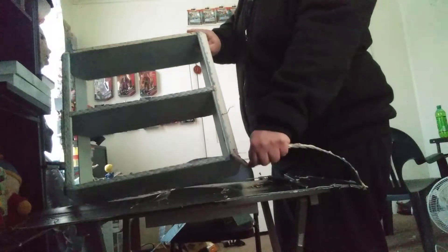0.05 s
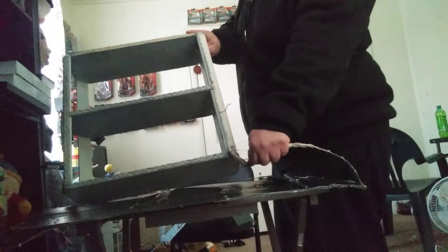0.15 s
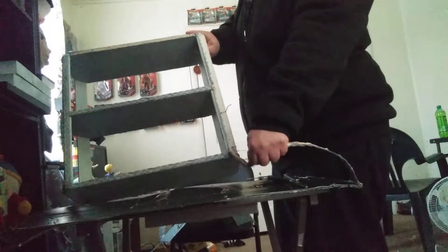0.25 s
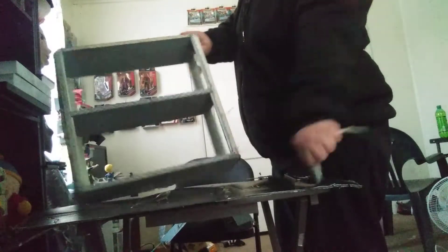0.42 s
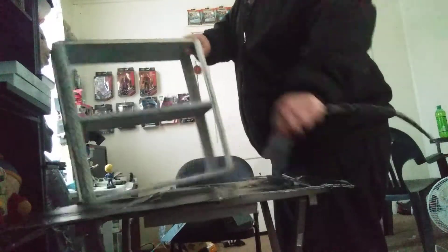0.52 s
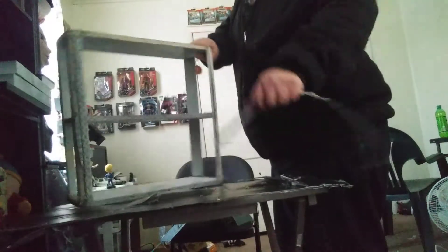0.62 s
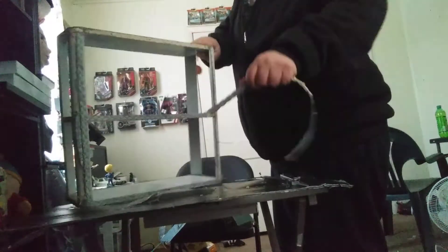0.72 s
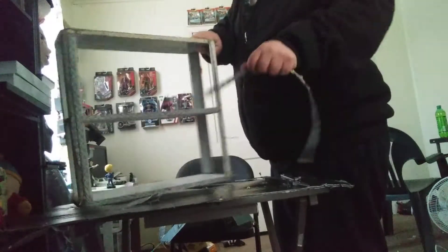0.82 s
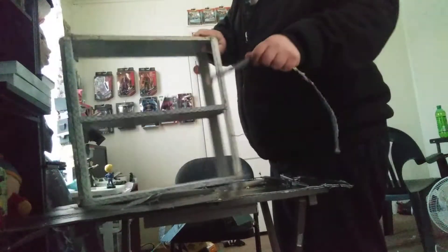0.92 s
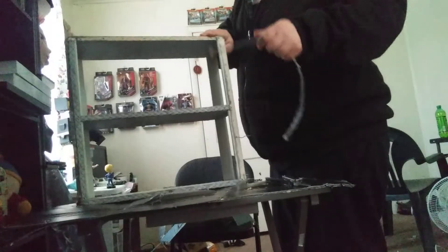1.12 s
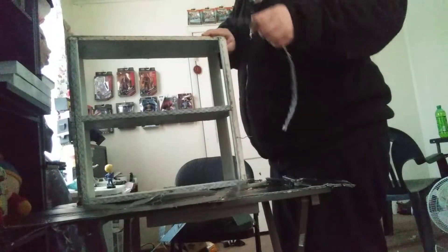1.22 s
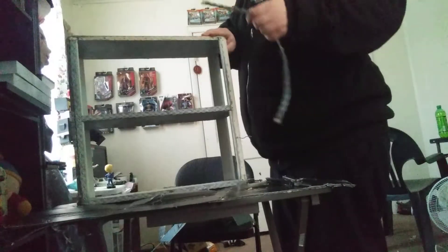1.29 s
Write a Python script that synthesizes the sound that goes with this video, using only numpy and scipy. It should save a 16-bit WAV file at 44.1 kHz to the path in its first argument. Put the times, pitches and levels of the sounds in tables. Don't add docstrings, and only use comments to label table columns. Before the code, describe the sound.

Sharp crack of trim tearing from a wooden shelf, then rocking thuds and scraping on a table

```python
import sys
import numpy as np
from scipy import signal
from scipy.fft import rfft, irfft
from scipy.io import wavfile
from scipy.ndimage import uniform_filter1d

SR = 44100
rng = np.random.default_rng(int(sys.argv[2]) if len(sys.argv) > 2 else 0)


def field_ratio(decibels):
    return 10 ** (np.asarray(decibels, dtype=float) / 20)


def materialize(psi):
    bounded = np.clip(np.atleast_2d(psi).T, -1, 1)
    quanta = np.round(bounded * 32767).astype(np.int16)
    wavfile.write(sys.argv[1], SR, quanta)


N = 59535
T = np.arange(N) / SR


def white():
    return rng.standard_normal(N)


def rms_one(x):
    return x / np.sqrt(np.mean(x ** 2) + 1e-20)


def band_pass(x, order, edges_hz):
    return signal.sosfilt(signal.butter(order, edges_hz, "band", fs=SR, output="sos"), x)


def at_hz(points, hz):
    points = np.array(points)
    return np.interp(np.log(np.maximum(hz, 1)), np.log(points[:, 0]), points[:, 1])


def colour(x, points):
    size = 2 ** 17
    gain = rms_one(field_ratio(at_hz(points, np.fft.rfftfreq(size, 1 / SR))))
    cepstrum = irfft(np.log(gain), size)
    cepstrum[1:size // 2] *= 2
    cepstrum[size // 2 + 1:] = 0
    return irfft(rfft(x, size) * np.exp(rfft(cepstrum)), size)[:N]


def split(low, high):
    low_pass, high_pass = (signal.butter(4, 8000, kind, fs=SR, output="sos") for kind in ("low", "high"))
    return signal.sosfilt(low_pass, low) + signal.sosfilt(high_pass, high)


def ring(force, modes, sign=1):
    out = 0
    for k, (hz, db, t60) in enumerate(modes):
        r = field_ratio(-60 / (t60 * SR))
        w = 2 * np.pi * hz / SR
        mode = signal.lfilter([0, np.sin(w)], [1, -2 * r * np.cos(w), r * r], force + 1e-18)
        out = out + sign ** k * field_ratio(db) * mode
    return out


def grains(per_s, spread_db):
    sizes = field_ratio(spread_db * np.minimum(rng.exponential(1, N), 4)) * rng.choice([-1, 1], N)
    return rms_one(sizes * (rng.random(N) < per_s / SR))


def burst(start, db, t60):
    return (T >= start) * field_ratio(db - 60 * np.maximum(T - start, 0) / max(t60, .003))


def bands(x, peaks, leak_db):
    warble_db, warble_per_s, narrowest_hz = 4.5, 25, 170
    probe = np.stack([x, white()])
    out = 0
    for hz, width, db in peaks:
        r = np.exp(-np.pi * np.clip(width, narrowest_hz, 900) / SR)
        y = probe
        for _ in range(2):
            y = signal.lfilter([1, 0, -1], [1, -2 * r * np.cos(2 * np.pi * hz / SR), r * r], y)
        warble = np.interp(T * warble_per_s, np.arange(200), rng.standard_normal(200))
        out = out + y[0] / y[1].std() * np.sqrt(width) * field_ratio(db + warble_db * warble)
    out = out / np.sqrt(sum(width * field_ratio(2 * db) for hz, width, db in peaks))
    leak = band_pass(probe, 4, (2700, 6470))
    return out + field_ratio(leak_db) * leak[0] / leak[1].std()


# f/Hz, level/dB, t60/s
SHELF_MODES = [(635, -5, .07), (688, -5, 0.097), (824, 1, 0.028), (921, -2, 0.095), (999, -7, 0.052),
               (1173, -7, 0.13), (1267, -2, 0.041), (1334, -5, 0.039), (1440, -7, .06), (1597, -5.5, 0.048),
               (1734, -8, 0.018), (2017, -6.5, .05)]


def shelf(force):
    longest_s, board_db = .11, 0.5
    probe = np.stack([force, white()])
    modes = ring(probe, [(hz, db, min(t60, longest_s)) for hz, db, t60 in SHELF_MODES], sign=-1)
    board = band_pass(probe, 3, (560, 1900))
    return modes[0] / modes[1].std() + field_ratio(board_db) * board[0] / board[1].std()


# t/s, level/dB, burst t60/s, shelf ring level/dB, brightness above 8 kHz level/dB
GLUE_SNAPS = [(0.162, -49.5, .1, -14.5, -6), (0.1678, -25, 0.068, -8.5, -3), (.185, -35, 0.076, -10.5, 1),
              (0.201, -36, .1, -19.5, -6), (0.213, -32, .05, -18.5, -6.5), (0.2171, -21, 0.07, -21.5, -10),
              (0.2219, -14, 0.11, -15.5, -8), (0.2354, -9, 0.11, -2, 3.5), (0.245, -15, 0.035, 0.5, 7),
              (.2545, -16.5, 0.065, -1, -1), (0.261, -13, 0.032, -2.5, -1), (0.356, -41.5, .02, -29, 14),
              (0.3944, -33.5, .03, -21, 20.5), (.408, -38, 0.041, -27, 15), (0.482, -39.5, 0.081, -2, 13)]
# f/Hz, level/dB per Hz
CRACK_SPECTRUM = [(880, -27), (1500, -1.5), (2700, 0), (2890, -3.5), (3450, -2), (5370, 1.5), (9390, -23.5),
                  (11800, -14.5), (15600, -31.5)]


def snaps():
    cracks = grains(per_s=6000, spread_db=3.5)
    air, wood, bright = 0, 0, 0
    for start, db, t60, wood_db, bright_db in GLUE_SNAPS:
        air = air + burst(start, db, t60) * cracks
        wood = wood + burst(start, db + wood_db, t60) * cracks
        bright = bright + burst(start, db + bright_db, t60) * cracks
    return colour(split(air, bright), [(500, -46)] + CRACK_SPECTRUM) + shelf(wood)


# t/s, table level/dB, bottom board level/dB, foot level/dB
BLOWS = [(.17, -59.5, -35, -42), (.236, -23.5, -19.5, -51), (.255, -22, -24.5, -40.5),
         (0.384, -55, -37, -60), (.427, -17, -29.5, -33), (.452, -25.5, -30.5, -31.5),
         (.474, -30, -27, -36), (0.513, -27.5, -32.5, -45), (0.554, -24.5, -32, -43),
         (0.8257, -20, -34.5, -32.5), (.833, -29.5, -31.5, -31.5), (0.855, -24, -27, -33),
         (0.886, -34.5, -34, -29.5), (0.914, -23, -35, -58), (.95, -28.5, -30.5, -34),
         (1.016, -34.5, -38.5, -58), (1.068, -42.5, -50, -58), (1.166, -56, -84.5, -73)]
# f/Hz, level/dB, t60/s
TABLE_MODES = [(75.4, -8.5, 0.36), (97, -6, 0.35), (124.2, 2.5, 0.15), (142, -8.5, 0.27)]
# f/Hz, level/dB, t60/s
PANEL_MODES = [(207.8, 1, 0.2), (240.2, -2, 0.16), (258.4, -1.5, 0.096), (287, -18, 0.058)]
# f/Hz, level/dB, t60/s
FOOT_MODES = [(590, -12, 0.099), (615, -5, 0.24), (675, 2, 0.075), (820, -9.5, 0.1)]


def thuds():
    contact_s, table_soft_hz = 0.00045, 220
    force = np.zeros((3, N))
    for start, *db in BLOWS:
        push = np.sin(np.pi * np.clip((T - start) / contact_s, 0, 1)) / (contact_s * SR)
        force -= field_ratio(np.array(db))[:, None] * push
    soft = signal.sosfilt(signal.butter(2, table_soft_hz, fs=SR, output="sos"), force[0])
    return ring(soft, TABLE_MODES) + ring(force[1], PANEL_MODES) + ring(force[2], FOOT_MODES)


# t/s, level/dB, grit above 8 kHz level/dB, shelf shake level/dB
FOOT_SKIDS = [
    [(.37, -42, 8, -10), (.41, -38.5, 1, -3), (.444, -32.5, 0.5, -7), (.47, -35.5, 1, 2),
     (.516, -39.5, 8, 10), (.534, -26, -4, 4), (.575, -33.5, 0.5, -12), (.684, -60, -14, 20),
     (.76, -62, -8, -2)],
    [(.822, -54, -20, -12), (.832, -36.5, -27, 17), (.855, -36.5, -9, -5), (.866, -31, 3, -4),
     (.9, -26, -4.5, 2), (.98, -52.5, -7, 12), (1.015, -44, -21, -3), (1.074, -55.5, -4, 2),
     (1.17, -85.5, 0, 8)],
]
# f/Hz, level/dB per Hz
SKID_SPECTRUM = [(450, -17.5), (700, -5.5), (1450, -2), (3150, -8.5), (5060, -2), (8800, -24), (12500, -30),
                 (15700, -37)]
# f/Hz, level/dB, t60/s
CHATTER_MODES = [(1004, -6, 0.048), (1150, -2, .05), (1457, 1, 0.053), (1550, 0.5, 0.067)]


def skids():
    rub_db, rumble_db, chatter_db = -1.5, -3, -20
    grain = field_ratio(rub_db) * grains(per_s=5000, spread_db=3.0)

    def follow(times, db):
        return field_ratio(np.interp(T, times, db, left=-120, right=-120)) * grain

    rub, grit, shake = 0, 0, 0
    for times, db, grit_db, shake_db in map(np.transpose, FOOT_SKIDS):
        rub = rub + follow(times, db)
        grit = grit + follow(times, db + grit_db)
        shake = shake + follow(times, db + shake_db)
    scrape = colour(split(rub, grit), [(100, -63.5)] + SKID_SPECTRUM)
    low_modes = TABLE_MODES + PANEL_MODES
    rumble = ring(rub, low_modes) / ring(white(), low_modes).std()
    chatter = ring(shake, CHATTER_MODES, sign=-0.92) / ring(grain, CHATTER_MODES, sign=-1.17).std()
    return scrape + field_ratio(rumble_db) * rumble + field_ratio(chatter_db) * chatter


# t/s, level/dB, burst t60/s
LAST_PEELS = [
    (1.2001, -52.5, 0.099),
    (1.222, -63, 0.061),
    (1.235, -60, 0.081),
    (1.289, -71.5, .15),
]
# f/Hz, width/Hz, level/dB
PEEL_BANDS = [(1670, 67, -10), (2290, 34, -5), (2850, 90, -8), (3494, 27, -4.5), (3657, 130, -10),
              (4220, 41, -4), (5140, 42, 2), (5520, 15, -12), (5790, 197, 0), (6140, 12, -3.5),
              (6060, 25, -7), (8900, 60, -17.5)]


def peels():
    fibres = sum(burst(*peel) for peel in LAST_PEELS) * grains(per_s=7400, spread_db=2.9)
    return bands(fibres, PEEL_BANDS, leak_db=-1.5)


# t/s, level/dB, broad part level/dB
GATE_OPENING = [(0, -55, -2.5), (.05, -64, -2.5), (.16, -60.5, -6), (.72, -81, 15), (.82, -74.5, 14.5),
                (1.0, -93, 7), (1.2, -89, 3), (1.35, -80, 0)]
# f/Hz, width/Hz, level/dB
FAN_BANDS = [(1370, 120, -5), (1600, 120, -8.5), (1770, 23, -11.5), (2370, 32, -7.5), (2940, 33, -7),
             (3340, 240, 0), (3650, 32, 0.5), (4150, 42, -1.5), (4900, 84, -3), (5020, 210, -6),
             (5700, 160, -6), (5930, 110, -5.5)]
# f/Hz, level/dB per Hz
HISS_SPECTRUM = [(40, -2), (100, -1), (230, -6.5), (450, -22), (1200, -20), (3000, -18), (7500, -26.5),
                 (15700, -24)]


def background():
    times, db, leak_db = np.transpose(GATE_OPENING)
    fan = bands(white(), FAN_BANDS, np.interp(T, times, leak_db)) * field_ratio(np.interp(T, times, db))
    hiss = field_ratio(-79) * colour(white(), HISS_SPECTRUM)
    knock = rms_one(ring(white(), PANEL_MODES) + field_ratio(-3.5) * ring(white(), FOOT_MODES))
    return fan + hiss + burst(0, db=-57, t60=.32) * knock


# f/Hz, t60/s
ROOM_DECAY = [(100, 0.31), (500, 0.18), (1500, 0.21), (5000, .3), (12000, 0.27)]


def room(x):
    gap_s, even_hz = 0.0054, 30
    t = T[:SR // 2]
    tail = 0
    for hz in 45 * 2. ** np.arange(9):
        octave = band_pass(rng.standard_normal(len(t)), 2, [hz, min(2 * hz, 21000)])
        tail = tail + octave * field_ratio(-60 * t / at_hz(ROOM_DECAY, hz * np.sqrt(2)))
    tail = tail * np.clip(t / gap_s, 0, 1)
    spectrum = rfft(tail, SR)
    even = np.sqrt(uniform_filter1d(np.abs(spectrum) ** 2, even_hz))
    tail = irfft(spectrum / even, SR)[:len(t)]
    return signal.fftconvolve(x, tail / np.sqrt(np.sum(tail ** 2)))[:N]


def scene():
    room_db = -7.5
    near = snaps() + thuds() + skids() + peels()
    return (near + field_ratio(room_db) * room(near) + background())[None]


def top_cut(x):
    return signal.sosfilt(signal.butter(12, 15780, fs=SR, output="sos"), x)


def record(dry):
    ceiling = .82
    x = signal.sosfilt(signal.butter(4, 58, "high", fs=SR, output="sos"), dry)
    x = x / (1 + (x / ceiling) ** 4) ** (1 / 4)
    x = signal.sosfilt(signal.cheby2(12, 60, 16200, fs=SR, output="sos"), x)
    return top_cut(x)


dry = scene()
out = record(dry)
materialize(out)
```